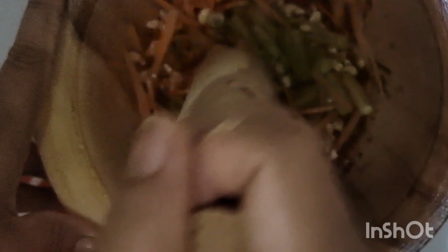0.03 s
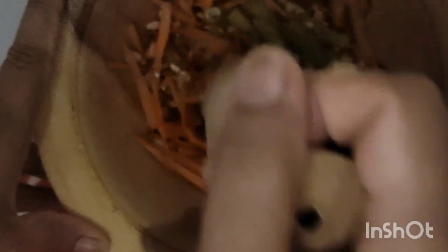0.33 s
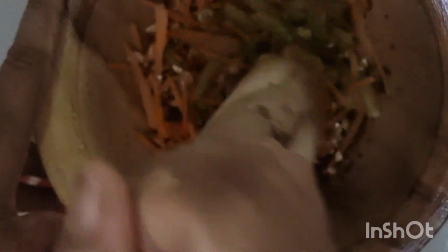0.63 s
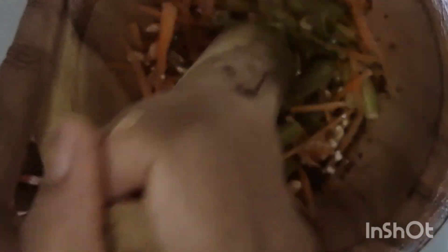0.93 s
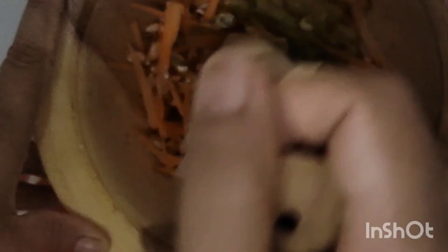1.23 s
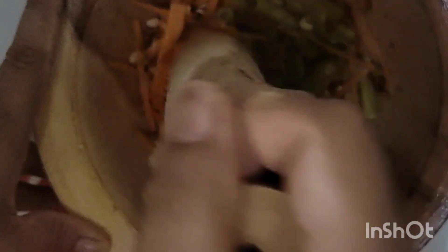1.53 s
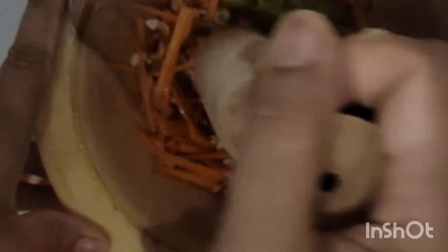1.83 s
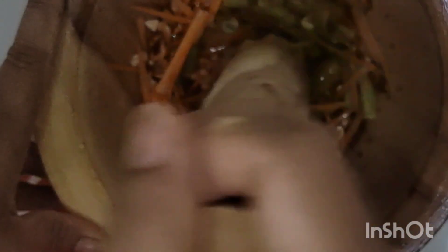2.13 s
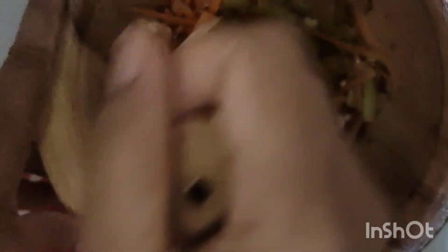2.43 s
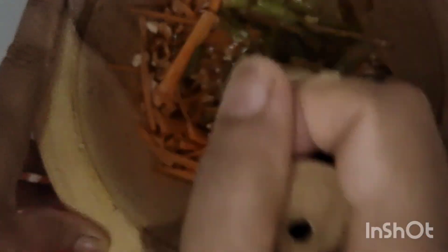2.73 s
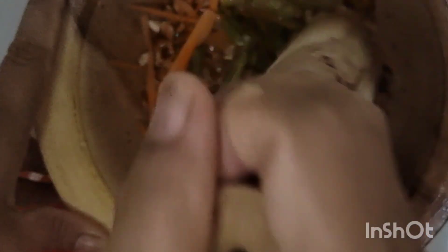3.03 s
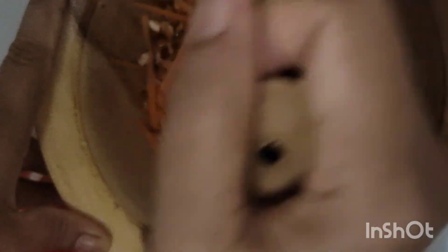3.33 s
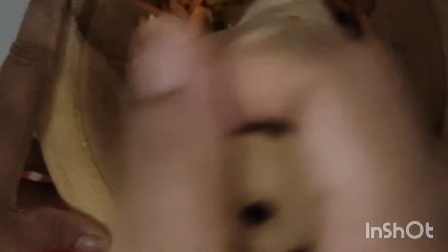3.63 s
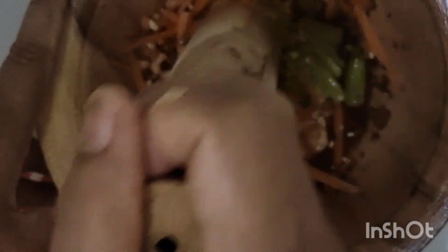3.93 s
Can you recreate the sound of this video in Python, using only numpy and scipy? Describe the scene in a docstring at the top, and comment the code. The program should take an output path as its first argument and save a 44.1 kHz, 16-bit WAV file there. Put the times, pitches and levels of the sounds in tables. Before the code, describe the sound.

A pestle pounds shredded vegetables in a mortar with quick wet crunches and dull knocks.

```python
"""A wooden pestle pounds shredded vegetables in a mortar, about 4.5 strokes a second, close to a stereo
microphone. Each stroke crushes wet fibres in a short crunch; then the pestle meets the bowl with a dull
knock and may bounce. One stroke hits the bare bowl and rattles it. The hard-walled kitchen rings after
every blow. Underneath lie room tone, a low hum and two soft handling rumbles."""
import sys
import numpy as np
from scipy import signal
from scipy.fft import rfft, irfft, next_fast_len
from scipy.io import wavfile
from scipy.ndimage import map_coordinates

SR = 44100
rng = np.random.default_rng(int(sys.argv[2]) if len(sys.argv) > 2 else 0)


def digitize_waveform(pressure):
    """Quantize a signal to 16-bit integers and store it at the path in sys.argv[1].

    Rows of a 2-D input are taken as channels; values are limited to [-1, 1].
    """
    field = np.atleast_2d(pressure).T
    bounded = np.clip(field, -1, 1)
    quanta = np.round(bounded * 32767).astype(np.int16)
    wavfile.write(sys.argv[1], SR, quanta)


N = 176400

# How alike the two channels are, for the room's ring and for the background noise.
# Each row: frequency in Hz, left-right correlation.
ROOM_LIKENESS = [(100, 1), (400, 0.74), (700, 0.34), (1300, 0), (10000, 0.074)]
BACKGROUND_LIKENESS = [(45, 0.05), (120, 0.98), (400, 0.76), (1500, 0.033)]


def amp(db):
    """Decibels to gain."""
    return 10 ** (np.asarray(db) / 20)


def unit(x):
    """Scale to rms 1."""
    return x / np.sqrt(np.mean(x ** 2) + 1e-20)


def along(points, hz):
    """Read (Hz, value) points on a log-frequency axis."""
    freqs, values = np.transpose(points)
    return np.interp(np.log(hz + 1), np.log(freqs + 1), values)


def bump(hz, centre_hz, octaves):
    """A bell curve on a log-frequency axis."""
    return np.exp(-(np.log2((hz + 1) / centre_hz) / octaves) ** 2)


def wander(x, spacing, count):
    """A random curve over x, drawn through evenly spaced points."""
    return np.interp(x, spacing * np.arange(count), rng.standard_normal(count))


def filtered(x, response):
    """Filter x by a function of frequency."""
    n = x.shape[-1]
    size = next_fast_len(n + 4096)
    return irfft(rfft(x, size) * response(np.fft.rfftfreq(size, 1 / SR)), size)[..., :n]


def resonate(x, gain):
    """Minimum-phase filter with one gain per FFT bin: resonances ring only after they are struck."""
    cepstrum = irfft(np.log(gain))
    size = len(cepstrum)
    fold = 1 + np.sign(size / 2 - np.arange(size))
    fold[0] = 1
    return irfft(rfft(x, size) * np.exp(rfft(cepstrum * fold)), size)[..., :x.shape[-1]]


def add(track, start, sound):
    """Mix a sound into the track from a start in seconds."""
    i = round(start * SR)
    sound, i = sound[..., max(-i, 0):], max(i, 0)
    track[:, i:i + sound.shape[-1]] += sound[..., :max(N - i, 0)]


def stereo_noise(colour, likeness, size):
    """Coloured noise with a given likeness between the channels."""
    def mid_side_gain(hz):
        angle = np.arccos(np.clip(along(likeness, hz), -1, 1)) / 2
        return amp(along(colour, hz)) * [np.cos(angle), np.sin(angle)]
    mid, side = filtered(rng.standard_normal((2, size)), mid_side_gain)
    return np.array([mid + side, mid - side])


def close_mic(x, pan_db=0, left_lead_s=0):
    """The microphone's two ports hear a near sound with different colour and timing."""
    # Imbalance of the ports. Each row: frequency in Hz, left over right in dB.
    ports = [(500, .9), (1600, -1.5), (2500, 2), (3400, -3), (4500, -6), (7000, -4.5), (8500, 1),
             (10000, 5), (12000, 2), (15000, 0)]
    sides = np.array([[.5], [-.5]])
    balance = lambda hz: amp(sides * (pan_db + along(ports, hz)))
    return filtered(x, lambda hz: balance(hz) * np.exp(2j * np.pi * hz * left_lead_s * sides))


def knocks():
    """The pestle meets the bowl: a cushioned blow, a faint ring, a wooden tick, a thud in the counter."""
    # Blows, bounces and, about 28 ms after some blows, their echoes off the walls. Each row: start in seconds,
    # level in dB, pitch in Hz, swell in seconds, room send in dB.
    blows = [(-.06, -8.5, 546, 0.0021, -11), (.317, -27, 415, 0.0043, 1), (.344, -28, 547, 0.0028, -2),
             (.541, -28, 480, 0.0013, -0.5), (.600, -30.5, 520, 0.0015, -16),
             (.767, -18.5, 500, 0.0031, -2), (.8145, -24, 590, 0.002, -18), (.9785, -15, 680, .0017, -15),
             (.9882, -12.5, 540, 0.0013, -7.5), (1.0042, -21.5, 585, 0.0018, -1),
             (1.2115, -23, 348, 0.0029, -4.5), (1.212, -19.5, 685, 0.0026, -2.5),
             (1.238, -21.5, 684, 0.0026, -5.5), (1.4195, -19.5, 714, 0.003, -10),
             (1.4203, -12.5, 424, 0.003, -9.5), (1.643, -22, 551, 0.0023, 6.5),
             (1.6503, -7, 496, 0.0015, -19), (1.8528, -13.5, 513, 0.0013, -7.5),
             (2.043, -22, 503, 0.0025, -3), (2.257, -30, 477, 0.0019, 4), (2.549, -23, 632, 0.0018, -3.5),
             (2.557, -25, 653, 0.0015, -23), (2.698, -16.5, 590, 0.0015, -1.5),
             (2.783, -23, 477, 0.0025, 0.5), (2.9053, -3, 603, .0013, 3), (2.913, -9, 654, 0.0015, -2),
             (2.9185, -14, 540, 0.0022, -2), (2.9455, -13.5, 640, 0.00324, -4.5),
             (3.02, -17, 564, 0.0044, -5), (3.227, -27.5, 588, 0.0022, 4), (3.139, -20.5, 460, 0.0036, 1),
             (3.348, -24, 532.5, 0.0017, 2), (3.356, -18, 577, 0.0016, -12.5),
             (3.557, -18.5, 620, 0.0016, -2.5), (3.5673, -13, 570, 0.0015, -18),
             (3.793, -15, 414, 0.0025, -10.5), (3.8113, -16.5, 635, 0.0021, -12.5)]
    # The bowl's modes. Each row: frequency in Hz, level in dB, seconds to fall 60 dB.
    bowl_modes = [(365.7, -26, 0.19), (572.5, -21.5, 0.21), (657.6, -18.5, 0.11), (805, -23.5, .08),
                  (1316, -48, 0.13), (2310, -34.5, 0.061)]
    # Wood touching the bowl. Each row: frequency in Hz, level in dB.
    tick_colour = [(100, -21), (700, -2), (1000, -11), (1300, 0), (1600, -4.5), (1900, -27), (2300, 0.5),
                   (3000, -9), (4000, -14), (6000, -27), (16000, -36)]
    thud_hz, thud_s, tick_s = 167, .0072, .0084
    track = np.zeros((2, N))
    t = np.arange(SR // 4) / SR
    for start, db, hz, swell, send_db in blows:
        u = t / swell
        blow = -u ** 2 * np.exp(2 * (1 - u)) * np.cos(2 * np.pi * hz * (t - swell))
        ring = np.zeros(len(t))
        for mode_hz, mode_db, t60 in bowl_modes:
            fade = amp(mode_db + rng.normal(0, 2)) * np.exp(-np.log(1000) * t / t60)
            shifted_hz = mode_hz * (1 + rng.normal(0, .025))  # by the filling and the holding hand
            ring += fade * np.sin(2 * np.pi * (shifted_hz * t + rng.random()))
        thud = amp(-29.5) * np.exp(-t / thud_s) * np.sin(2 * np.pi * thud_hz * t)
        tick = amp(-25) * np.exp(-t / tick_s) * unit(stereo_noise(tick_colour, ROOM_LIKENESS, len(t)))
        onset = 1 - np.exp(-u ** 2)
        knock = amp(db + .5) * (blow + onset * (ring + thud + tick))
        add(track, start, close_mic(knock, left_lead_s=-.00001))
        add(track, start, amp(send_db) * kitchen(knock[0]))
    return track


def kitchen(x):
    """Hard walls answer a blow: the ring builds up, and its uneven treble dies first."""
    # Reverberation time. Each row: frequency in Hz, seconds to fall 60 dB.
    decay_times = [(100, 0.91), (600, 0.91), (1500, 0.83), (3000, 0.59), (5000, 0.56), (9000, 0.49),
                   (15000, 0.33)]
    # Colour of the room's ring. Each row: frequency in Hz, level in dB.
    colour = [(80, -2), (170, 9.5), (260, 6), (370, 2.5), (470, -6), (570, -6), (660, 4.5), (780, 0.5),
              (950, 0), (1300, 3), (1800, -2.5), (2600, -1), (5000, -0.5), (10000, -2), (16000, -6.5)]
    # Lingering treble resonances. Each row: frequency in Hz, ripple depth in dB.
    ripple_depth = [(1000, 0), (4000, 1), (7000, 2.4)]
    build_s, ripple_spacing_hz = .017, 330
    hz, t, spectrum = signal.stft(stereo_noise(colour, ROOM_LIKENESS, SR), SR, nperseg=256)
    t60 = along(decay_times, hz)[:, None]
    fade = np.exp(-np.log(1000) * t / t60) * (1 - np.exp(-(t / build_s) ** 2))
    fade /= np.sqrt(SR * np.mean(fade ** 2, axis=1, keepdims=True))
    ripple = amp(along(ripple_depth, hz) * wander(hz, ripple_spacing_hz, len(hz)))
    tail = signal.istft(spectrum * fade * ripple[:, None], SR, nperseg=256)[1]
    return amp(-1.5) * signal.fftconvolve(x[None], tail, axes=1)


def room_tone():
    """The kitchen's steady noise, mostly bass."""
    # Each row: frequency in Hz, level in dB.
    colour = [(20, -14), (45, -2.5), (75, 4.5), (110, 2.5), (160, 2.5), (250, -6.5), (600, -13),
              (1100, -14), (2500, -22), (4500, -25.5), (7000, -62)]
    return amp(-50.5) * unit(stereo_noise(colour, BACKGROUND_LIKENESS, N))


def hum():
    """A low tone in the background swells and wavers."""
    # Each row: time in seconds, level change in dB.
    swell = [(0, 7.5), (.28, 16.5), (.4, -0.5), (2.3, -17), (2.7, 8), (3.2, 3), (4, 5)]
    hum_hz = 78.9
    t = np.arange(N) / SR
    waver_db = 2.5 * map_coordinates(rng.standard_normal(40), [t * 4], mode="nearest")
    return amp(-56 + np.interp(t, *np.transpose(swell)) + waver_db) * np.sin(2 * np.pi * hum_hz * t)


def snaps():
    """Single fibres break as the pestle touches, presses or leaves the heap."""
    # Each row: start in seconds, level in dB, band centre in Hz, band width in octaves.
    fibres = [(.082, -27.5, 3500, 2.2), (0.093, -29, 3480, 1.2), (0.304, -32, 3960, 1.5),
              (0.87, -36, 7000, 2.4), (1.208, -15, 4070, 0.076), (1.4062, -14.5, 4330, 0.58),
              (1.422, -27.5, 7950, 1.2), (1.491, -38, 11600, 0.33), (1.625, -26, 5070, 1.4),
              (2.255, -16, 13200, 0.33), (3.449, -31, 2640, 0.11)]
    decay_s, send_db = .0051, -28
    track = np.zeros((2, N))
    t = np.arange(SR // 25) / SR
    for start, db, centre_hz, octaves in fibres:
        band = unit(filtered(rng.standard_normal(len(t)), lambda hz: bump(hz, centre_hz, octaves)))
        snap = amp(db) / 2 * np.exp(-t / decay_s) * band
        add(track, start, close_mic(snap))
        add(track, start, amp(send_db) * kitchen(snap))
    return track


def crunches():
    """Wet fibres snap ever harder as the pestle sinks in, then give way and settle."""
    # Each row: peak time, rise and decay in seconds; level, hollowness, bite, fizz, left over right and
    # room send in dB; cavity pitch in Hz and boost in dB; overtone pitch in Hz and boost in dB.
    strokes = [(.094, 0.0086, 0.015, -22.5, -9, 3, -12, 2, -17.5, 2740, -0.5, 4360, 2),
               (.3131, 0.00078, 0.0024, -15, -12, 4, -8.5, 1, -5, 3000, 3.5, 4130, 7),
               (0.5382, 0.0019, 0.006, -13.5, -14, -3.5, -8, .5, -15, 2380, 6, 2761, 9.5),
               (0.7641, 0.0022, .0063, -17, -4, -2.5, -7.5, 1, -7, 9400, 7, 4850, 7),
               (0.9779, 0.0024, 0.006, -15.5, -8.5, -6, -7, 2, -12.5, 2300, 10.5, 3380, 5),
               (1.209, 0.0015, 0.0028, -13.5, -6, -5, -6, 2, -6, 4400, 5, 4210, 6),
               (1.4064, 0.0002, 0.0067, -12, -22.5, -10.5, -22.5, -1, -6, 3340, 2.5, 10800, 4),
               (1.6404, 0.0047, 0.0051, -15, -12.5, -7, -10, 1, -15, 2040, 10.5, 9900, 4),
               (1.8405, 0.0025, 0.0047, -9.5, -13, -10, -17.5, -0.5, -8, 2410, 10, 1390, 10),
               (2.042, 0.0011, 0.0026, -9.5, -9, -2, -7, 2, -10, 4360, -1.5, 5800, 8.5),
               (2.2554, 0.0012, 0.0013, -23.5, -13.5, -7.5, 6.5, -3, -0.5, 3010, 10, 1337, 14),
               (2.488, 0.0085, 0.0076, -26.5, 0, -4.5, -1.5, -0.5, -6, 1310, 6.5, 1291, 6),
               (2.6982, 0.00094, 0.0025, -11, -2.5, -3, -5, -3.5, -9.5, 4170, 6.5, 3060, 4),
               (3.1385, 0.0038, 0.0062, -18, -3, -17, -1.5, -1.5, -35, 2540, 15.5, 3026, 5),
               (3.146, 0.00034, 0.0094, -23, -25, -2, -12, -1, -4, 4550, 2.5, 3120, 3),
               (3.3482, .0023, 0.0047, -11, -17, -9.5, -11.5, -1, -8.5, 11200, 9.5, 6200, 5),
               (3.556, .003, 0.0097, -14, -17, -8, -9.5, 0, -14.5, 2350, 5, 3440, 3.5),
               (3.7788, 0.0015, 0.0071, -10, -7, -8, -7, 0.5, -15, 2430, 2, 1770, 9),
               (3.999, 0.003, 0.0033, -24, -7, -7.5, -7.5, 1.5, -7, 4030, 10, 4000, 4)]
    # Colour of a crunch inside the bowl. Each row: frequency in Hz, level in dB.
    bowl_colour = [(100, -10.5), (400, 5.5), (900, 5.5), (1300, 0.5), (1750, 2.5), (2000, 6.5), (2300, 8.5),
                   (2650, 6.5), (3050, 6.5), (3500, 3.5), (4200, 4), (5300, -3), (6600, -1.5), (8200, -2),
                   (10000, 1), (13000, -1), (16000, -8.5)]
    # Frequencies in Hz of hollowness, bite, a neutral point and fizz.
    tint_hz = [1400, 2600, 5000, 11500]
    # The pestle wanders before the microphone. Each row: time in seconds, left channel's lead in seconds.
    left_lead = [(0, 0.00034), (2.6, -0.00048), (3.1, .00008), (4, .00006)]
    grain_db, grain_s, stereo_spread = 5.5, .0004, .65
    lead_in_s, settle_db, settle_s = .04, -28, .014
    ripple_db, ripple_spacing_hz = 1.9, 170
    track = np.zeros((2, N))
    t = np.arange(SR // 7) / SR - lead_in_s
    before, after = np.maximum(-t, 0), np.maximum(t, 0)
    hz = np.fft.rfftfreq(16384, 1 / SR)
    pulse = signal.unit_impulse(len(t), round(lead_in_s * SR))  # the room gets all directions evenly
    for (peak, rise, decay, db, hollow_db, bite_db, fizz_db, pan_db, send_db,
         cavity_hz, cavity_db, overtone_hz, overtone_db) in strokes:
        press = np.exp(-(before / rise) ** 1.1)
        release = np.exp(-after / decay) + amp(settle_db) * np.exp(-after / settle_s)
        grain = amp(grain_db * wander(t - t[0], grain_s, len(t)))
        mid, side = rng.standard_normal((2, len(t))) * press * release * grain
        crackle = np.array([mid + stereo_spread * side, mid - stereo_spread * side])
        crackle /= np.sqrt(np.sum(crackle ** 2) / 2)
        tint = along(list(zip(tint_hz, (hollow_db, bite_db, 0, fizz_db))), hz)
        ripple = ripple_db * wander(hz, ripple_spacing_hz, SR // 200)  # bowl resonances shift each stroke
        cavity = cavity_db * bump(hz, cavity_hz, octaves=.14)  # the gap under the pestle
        overtone = overtone_db * bump(hz, overtone_hz, octaves=.06)  # favoured by the spot of contact
        gain = amp(db + 23.5 + along(bowl_colour, hz) + tint + ripple + cavity + overtone)
        left_lead_s = np.interp(peak, *np.transpose(left_lead))
        add(track, peak - lead_in_s, close_mic(resonate(crackle, gain), pan_db, left_lead_s))
        add(track, peak - lead_in_s, amp(send_db) * kitchen(resonate(pulse, gain)))
    return track


def handling_rumbles():
    """Handling noise: two soft swells of deep bass."""
    # Each row: peak time in seconds, half length in seconds, level in dB.
    swells = [(0.57, 0.15, -42), (1.2, 0.13, -44.5)]
    # Each row: frequency in Hz, level in dB.
    colour = [(20, -14), (45, 20), (70, 14.5), (130, -26), (300, -69), (2000, -78)]
    t = np.arange(N) / SR
    level = sum(amp(db) * np.exp(-((t - peak) / half) ** 2) for peak, half, db in swells)
    return level * unit(stereo_noise(colour, BACKGROUND_LIKENESS, N))


def scene():
    """The mortar up close, the kitchen behind it."""
    return crunches() + snaps() + knocks() + hum() + handling_rumbles() + room_tone()


def record(dry):
    """The recorder rounds off the highest peaks and cuts the top treble."""
    ceiling, top_hz = .8, 16000
    rounded = dry / (1 + (dry / ceiling) ** 6) ** (1 / 6)
    return filtered(rounded, lambda hz: 1 / np.sqrt(1 + (hz / top_hz) ** 120))


dry = scene()
out = record(dry)
digitize_waveform(out)
```